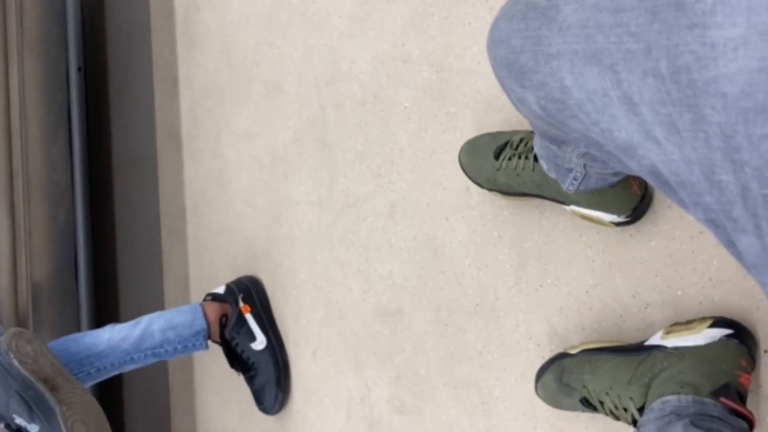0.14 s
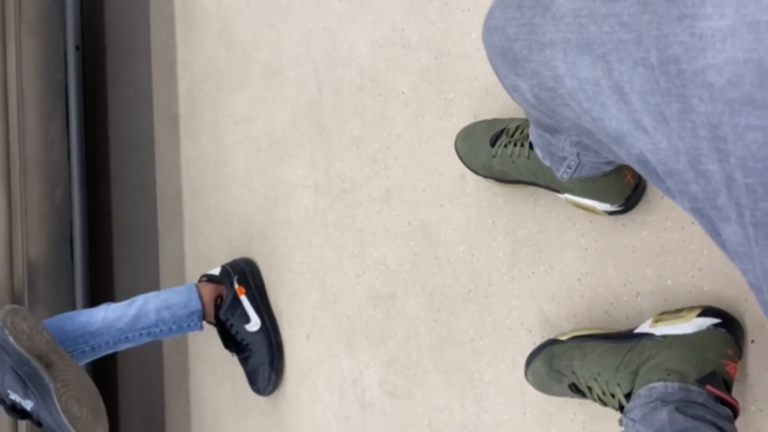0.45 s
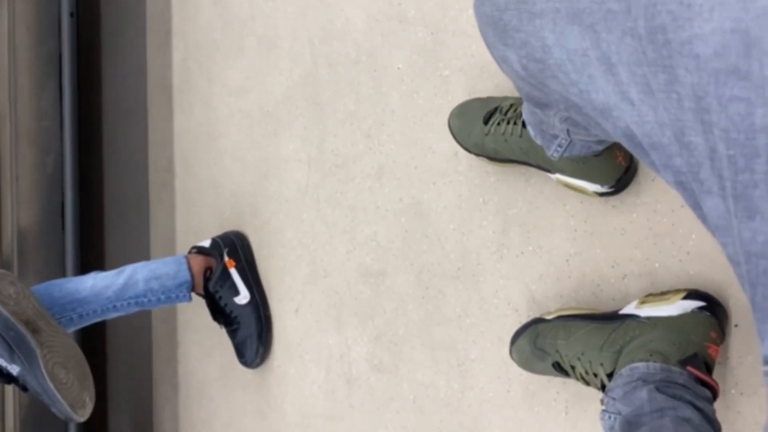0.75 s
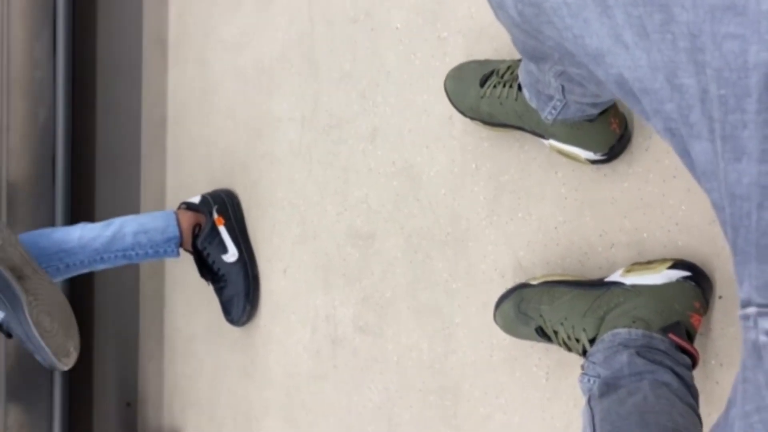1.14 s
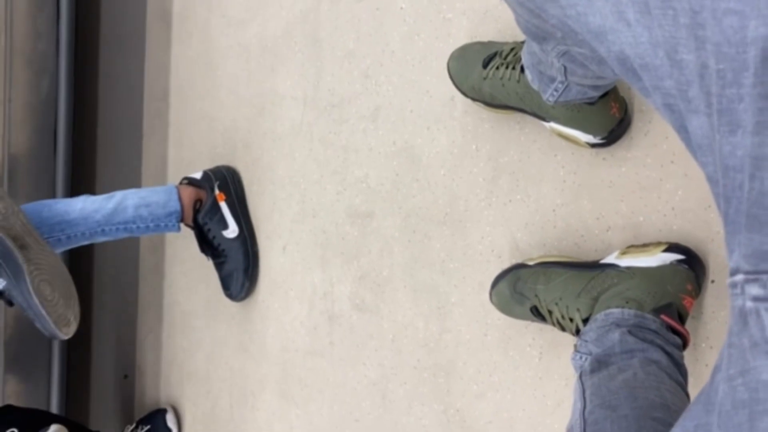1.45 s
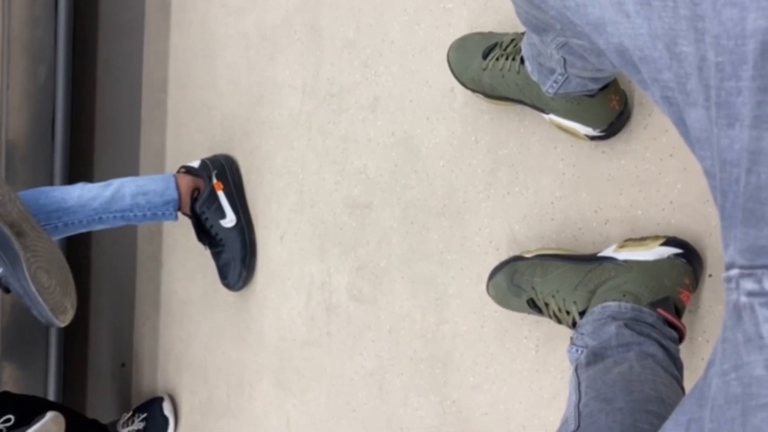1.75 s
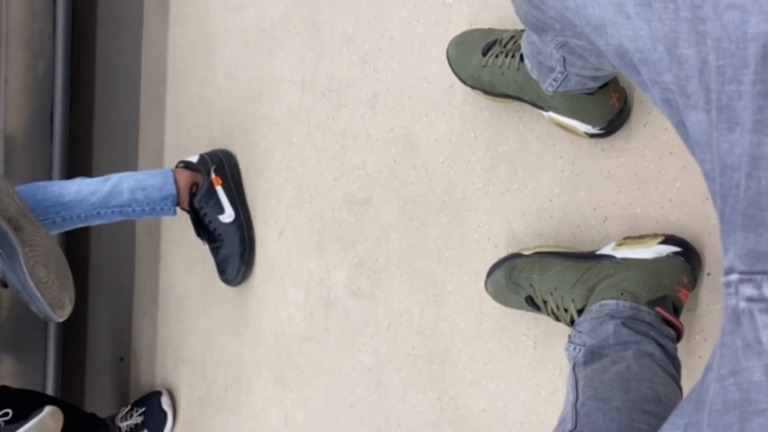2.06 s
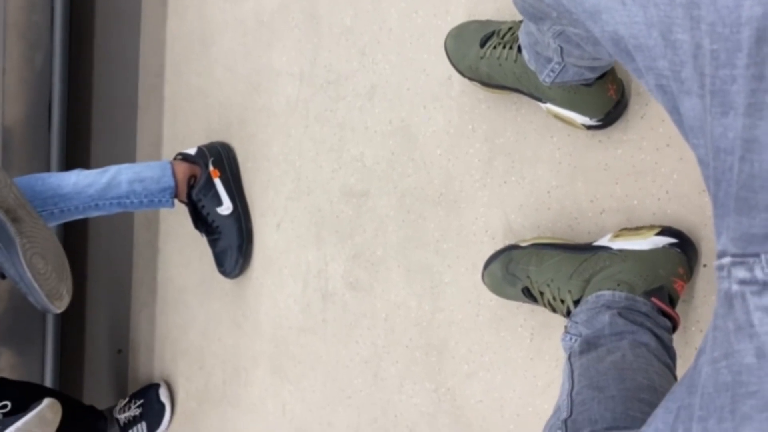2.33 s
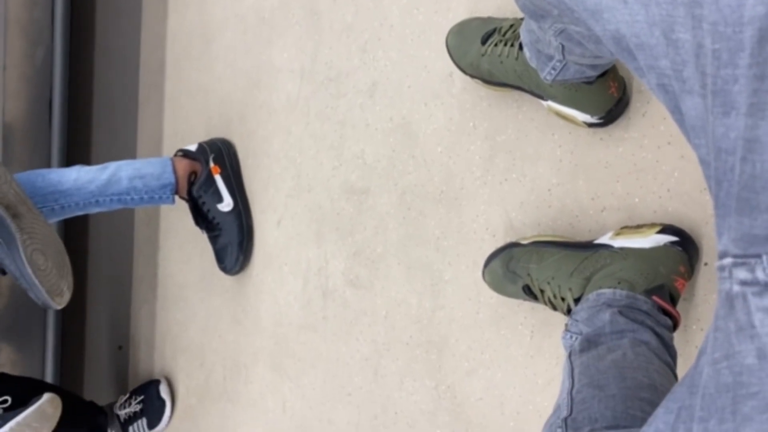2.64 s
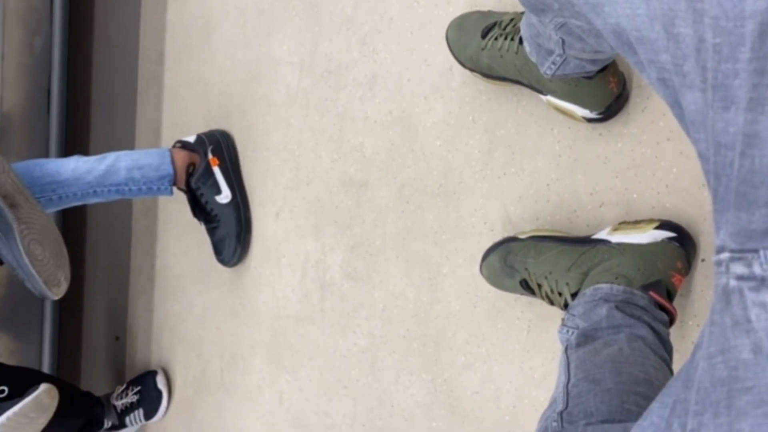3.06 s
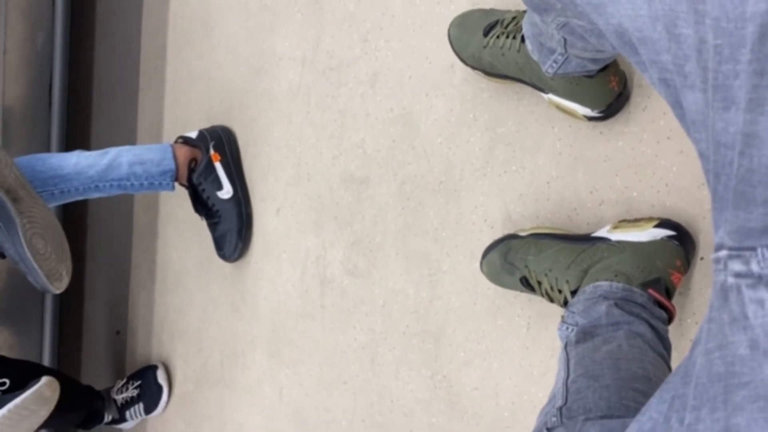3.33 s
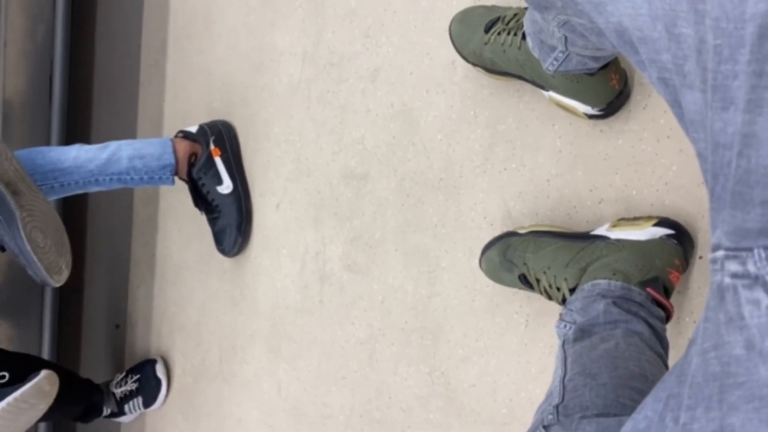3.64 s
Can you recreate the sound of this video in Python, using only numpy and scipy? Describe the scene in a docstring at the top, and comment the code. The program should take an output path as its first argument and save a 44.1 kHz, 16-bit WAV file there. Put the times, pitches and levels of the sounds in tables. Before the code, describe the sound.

A running subway train rumbles and drones steadily from within, with soft jolts and faint wheel ringing

```python
"""Inside a running metro carriage

The car body rumbles as shaped noise with soft, decaying low jolts; a drive hum throbs over a low drone.
The wheels roar as flickering bands of noise, ring as narrow bands and briefly sing as gliding tones.
A few thin, fluttering hisses and one broader rush are enveloped noise.
Two closely spaced microphones hear nearly the same bass and a more diffuse treble.
"""
import sys
import numpy as np
from scipy import signal
from scipy.fft import rfft, irfft
from scipy.io import wavfile
from scipy.ndimage import uniform_filter1d

SR = 44100
rng = np.random.default_rng(int(sys.argv[2]) if len(sys.argv) > 2 else 0)


def unload_wav(signal):
    """Save mono or channel-first audio to the path in sys.argv[1] as 16-bit WAV at rate SR, clipped to [-1, 1]."""
    wavfile.write(
        sys.argv[1],
        SR,
        np.round(np.clip(np.atleast_2d(signal).T, -1, 1) * 32767).astype(np.int16),
    )


N = 167580
SIDES = np.array([[1], [-1]])  # left microphone, right microphone

# Course of the rolling noise. Each row: time in seconds, level in dB.
ROLLING_LEVEL = [(0.0, -29.5), (0.1, -32), (0.17, -30), (0.51, -31.5), (0.97, -30.5), (1.5, -29.5),
                 (1.84, -31), (2.14, -28), (2.45, -30), (2.75, -30.5), (2.99, -28.5), (3.6, -30),
                 (3.8, -29)]
ROLLING_REF_DB = -30.5  # the level at which the rolling noise is neither raised nor lowered


def undb(db):
    """Amplitude ratio of a level in dB."""
    return 10 ** (np.asarray(db) / 20)


def times():
    """Time of every sample in seconds."""
    return np.arange(N) / SR


def freqs():
    """Frequency of every spectrum bin in Hz, kept at 1 Hz or more for the logarithms."""
    return np.maximum(np.arange(N // 2 + 1) * SR / N, 1)


def curve(rows, column=1):
    """One column of a control table, joined by straight lines in time."""
    rows = np.array(rows, float)
    return np.interp(times(), rows[:, 0], rows[:, column])


def over_freq(rows, column=1):
    """One column of a table, joined by straight lines over log frequency."""
    rows = np.array(rows, float)
    return np.interp(np.log(freqs()), np.log(rows[:, 0]), rows[:, column])


def colour(rows):
    """Gain that gives unit noise the listed dB per Hz, falling steeply beyond the table's ends."""
    f = freqs()
    beyond_ends = np.minimum(1, np.minimum(f / rows[0][0], rows[-1][0] / f)) ** 4
    return undb(over_freq(rows)) * np.sqrt(SR / 2) * beyond_ends


def walk(rate):
    """Slow chance with a spread near 1: random steps, rate per second, smoothed twice."""
    k = int(SR / rate)
    steps = np.repeat(rng.standard_normal(N // k + 1), k)[:N]
    return 1.3 * uniform_filter1d(uniform_filter1d(steps, k), k)


def envelope(start, attack, hold, decay, db):
    """Linear attack, hold, exponential release."""
    t = times() - start
    release = np.exp(-np.maximum(t - attack - hold, 0) / decay)
    return undb(db) * np.clip(t / attack, 0, 1) * release


def rolling_effort_db():
    """Rise and fall of the rolling noise around its reference level."""
    return curve(ROLLING_LEVEL) - ROLLING_REF_DB


def cabin_field():
    """Spectrum of unit noise in the cabin, part shared by the two microphones and part opposed."""
    # Each row: frequency in Hz, likeness of the two microphones from 0 to 1,
    # phase lead of the right one in radians, level of left minus right in dB.
    microphones = [(50, 1, .02, 0), (120, .997, .06, -.2), (220, .985, .2, -.8), (400, .94, .38, -.8),
                   (550, .68, .8, -1), (800, .52, .9, -1.3), (1050, .2, 2.8, -1.2), (1500, .25, 4.7, -1),
                   (2000, .4, 5.6, -.6), (2600, .5, 4, 0), (3300, .56, 4.1, 0), (4150, .64, 5, -.4),
                   (4700, .4, 5, 0), (5200, .63, 5.7, 0), (6200, .77, 4.4, 0), (7400, .9, 3.14, 0),
                   (8300, .78, 2.3, 0), (9000, .77, 1.3, 0), (10500, .8, 0, 0), (12500, .7, -1.4, 0)]
    shared, opposed = rfft(rng.standard_normal((2, N)))
    likeness = over_freq(microphones, column=1)
    lead = over_freq(microphones, column=2)
    pan_db = over_freq(microphones, column=3)
    pair = shared * np.sqrt((1 + likeness) / 2) + SIDES * opposed * np.sqrt((1 - likeness) / 2)
    return pair * undb(SIDES * pan_db / 2) * np.exp(-.5j * SIDES * lead)


def rumble():
    """The car body shakes as low noise, with now and then a soft, damped jolt from the track."""
    # Spectrum of the shaking body. Each row: frequency in Hz, density in dB per Hz.
    body_spectrum = [(15, -74), (24, -61), (33, -48.5), (56, -40), (70, -44), (92, -52), (120, -49.5),
                     (160, -53), (215, -53), (265, -65), (400, -74)]
    # Course of the shaking. Each row: time in seconds, level in dB.
    shaking = [(0.0, -30), (0.24, -28), (0.4, -30.5), (0.7, -25), (0.93, -27.5), (1.1, -26), (1.26, -30.5),
               (1.48, -28), (1.85, -26.5), (2.3, -26), (2.7, -26.5), (3.48, -25.5), (3.8, -25.5)]
    # Jolts. Each row: time of the envelope's peak in seconds, level of that peak in dB.
    jolts = [(.30, -30), (.61, -19), (.70, -16), (1.53, -16), (2.18, -21), (2.30, -23), (2.86, -21),
             (2.96, -20), (3.04, -20), (3.24, -18), (3.55, -25)]
    shaking_ref_db, follow = -27.5, 0.77  # neutral level, dB of rumble per dB of shaking
    jolt_hz, rise_s = 54.2, .012
    out = irfft(cabin_field() * colour(body_spectrum), N)
    out = out * undb(follow * (curve(shaking) - shaking_ref_db))
    for peak_time, db in jolts:
        t = np.maximum(times() - peak_time + rise_s, 0)
        thump = t / rise_s * np.exp(1 - t / rise_s)
        out = out + undb(db) * thump * np.sin(2 * np.pi * jolt_hz * t)
    return out


def roar():
    """Rolling noise: half-octave bands swell together and flicker alone."""
    # Spectrum of the rolling roar. Each row: frequency in Hz, density in dB per Hz.
    roar_spectrum = [(180, -79.5), (270, -61), (340, -55), (400, -57), (480, -58), (630, -65), (740, -59.5),
                     (860, -61.3), (1050, -64.5), (1300, -69.6), (1650, -73.5), (2300, -78), (3000, -79.5),
                     (3900, -85.5), (4700, -87.3), (5400, -87.5), (6200, -90.5), (7400, -96.5), (8500, -99),
                     (10500, -105), (11800, -112.5), (13000, -116)]
    swell_follow, treble_follow = 1.14, 0.37  # dB of change per dB of effort and flicker
    flicker_db, flicker_rate = 1.2, 16  # spread before that scaling, steps per second
    effort_db = rolling_effort_db()
    field, out = cabin_field() * colour(roar_spectrum), 0
    place = np.clip(2 * np.log2(freqs() / 250), 0, 9)  # half octaves above 250 Hz
    for k in range(10):
        crossfade = np.maximum(1 - abs(place - k), 0)
        band = irfft(field * crossfade, N)
        follow = swell_follow if k < 6 else treble_follow  # treble bands centre on 2 kHz and up
        out = out + band * undb(follow * (effort_db + flicker_db * walk(flicker_rate)))
    return out


def wheels():
    """Rail roughness keeps wheel and rail modes ringing; rubbing lifts those near one pitch."""
    # Ringing modes. Each row: frequency in Hz, width in Hz (the gain halves two widths away),
    # rms level in dB before the trim.
    modes = [(340, 11, -44), (449, 6, -46.5), (540, 6, -51.5), (726, 7, -47.2), (850, 7, -52),
             (1062, 6, -54), (1920, 32, -50.5), (2030, 40, -53.5), (2519, 6, -62.5), (2583, 9, -53.8),
             (2605, 30, -57), (2851, 30, -57), (3101, 8, -63.5), (3271, 7, -62.5), (3329, 7, -60),
             (3374, 8, -66), (3430, 80, -57), (4134, 8, -67), (4200, 22, -60.5), (5190, 35, -64.5)]
    # Moments when the wheels rub harder. Each row: start, attack, hold and decay in seconds,
    # lift in dB for a mode right at the rubbing pitch.
    rubs = [(1.16, .05, 0.22, .1, 1), (2.06, 0.1, 0.22, 0.1, 3.2), (3.07, .09, 0.047, 0.039, 5.5)]
    rubbing_hz, rubbing_octaves = 2400, 0.63  # centre and reach of the lift
    trim_db, waver_db, waver_rate = -0.4, 2.5, 26  # waver: spread in dB, steps per second
    drift, drift_rate = 0.000497, 7  # share by which each pitch wanders, steps per second
    field, out, t = cabin_field(), 0, times()
    effort_db = rolling_effort_db()
    lift_db = sum(lift * envelope(start, attack, hold, decay, 0)
                  for start, attack, hold, decay, lift in rubs)
    for hz, width, db in modes:
        shape = 1 / (1 + ((freqs() - hz) / (2 * width)) ** 2)
        steady = irfft(field * shape / np.sqrt(np.mean(shape ** 2)), N)
        # reading the ring at a slightly uneven pace makes its pitch drift
        drifting = t + np.cumsum(drift * walk(drift_rate)) / SR
        ring = np.array([np.interp(drifting, t, side) for side in steady])
        # modes near the rubbing pitch follow the rubs, the others the rolling
        share = np.exp(-(np.log2(hz / rubbing_hz) / rubbing_octaves) ** 2)
        driven_db = share * lift_db + (1 - share) * effort_db
        out = out + ring * undb(db + trim_db + driven_db + waver_db * walk(waver_rate))
    return out


def singing():
    """Now and then one wheel or rail resonance swells into a short, wavering tone and fades."""
    # Each row: start in seconds, length in seconds, pitch at the middle in Hz,
    # glide from start to end in Hz, rms level at the crest in dB before the trim.
    sings = [(.08, .5, 342, -4, -37), (.33, .12, 3332, 0, -56.5), (.79, .11, 3328, 0, -55.5),
             (0.949, .45, 341, 0.5, -39), (1.28, 0.34, 731, -0.5, -42.5), (1.45, 0.34, 454, 24.5, -41.5),
             (1.55, 0.18, 345.8, 0, -37.5), (1.876, 0.21, 334, -2, -34.5), (1.9, .2, 727, -1, -40),
             (2.09, .13, 745, 1, -37.5), (2.1, 0.26, 448, -0.5, -39.5), (2.218, .16, 726, -3, -40),
             (2.256, 0.081, 3325, 0, -51), (2.45, 0.23, 761, 0, -43), (2.73, .11, 2597, -1, -54),
             (2.76, .22, 327.1, 0, -35), (2.96, .16, 348, -1, -37), (3.06, .13, 1998, -2, -50.5),
             (3.12, .18, 2606, -1, -50), (3.161, 0.33, 396.5, -46.5, -38.5), (3.2, 0.19, 733, -20.5, -37.5),
             (3.22, 0.19, 349, 0, -35), (3.576, 0.21, 332.4, -15, -34.5), (3.66, .14, 726, -3, -39)]
    trim_db, waver_spread_db, wander_spread_hz = 2.5, 1.5, 2.88
    waver_rate = 30  # steps per second, for level and pitch
    diffuse_hz = 1000  # from here up the microphones hear a tone a quarter cycle apart
    t, out = times(), np.zeros((2, N))
    wander_hz = wander_spread_hz * walk(waver_rate)
    waver_db = waver_spread_db * walk(waver_rate)
    for start, length, hz, glide_hz, db in sings:
        on = (t > start) & (t < start + length)
        along = (t[on] - start) / length
        pitch = hz + glide_hz * (along - .5) + wander_hz[on]
        phase = 2 * np.pi * (rng.random() + np.cumsum(pitch) / SR)
        lag = np.pi / 2 * min(hz / diffuse_hz, 1)
        swell = np.sin(np.pi * along) * undb(db + trim_db + waver_db[on])
        out[:, on] += np.sqrt(2) * swell * np.sin(phase - SIDES * lag / 2)
    return out


def hum():
    """A clean, throbbing sine of the drive over a lower, wandering sine drone of the car body."""
    # Drive hum. Each row: time in seconds, level in dB before throb depth and trim, pitch in Hz.
    drive = [(0.0, -27, 199.3), (0.04, -26, 198.6), (0.69, -28.5, 198.4), (0.79, -21.5, 199.1),
             (1.14, -30, 200), (1.24, -23, 198.5), (1.42, -22.5, 197.6), (1.51, -30.5, 198.5),
             (1.59, -28.5, 198.6), (1.75, -20.5, 198.6), (1.95, -27.5, 198.3), (2.15, -31, 198.6),
             (2.29, -23, 198.4), (2.44, -27.5, 198.2), (2.59, -22.5, 199.3), (2.77, -23, 198.2),
             (2.94, -39.5, 197.5), (3.1, -24.5, 198.6), (3.19, -20.5, 199.1), (3.43, -29, 196.9),
             (3.51, -20.5, 199.3), (3.7, -24.5, 197.1), (3.76, -30, 195), (3.8, -33, 191)]
    # Drone of the car body. Each row: time in seconds, rms level in dB before the trim.
    drone_level = [(0.0, -24), (0.05, -25), (0.17, -40.5), (0.51, -27), (1.24, -30.5), (1.29, -23),
                   (1.46, -41), (1.54, -19.5), (1.82, -37), (1.98, -27), (3.26, -25.5), (3.38, -40),
                   (3.44, -23), (3.8, -32)]
    mean_db, throb_depth = -27, 1.07  # the throb is deepened around this level
    trim_db, waver_db = -0.5, 0.5
    left_lag_rad, left_pan_db = 0.28, -.9  # left microphone against right
    drone_hz, drone_trim_db, drone_wander = 80.16, -1, 0.0079  # wander as a share of the pitch
    phase = 2 * np.pi * np.cumsum(curve(drive, column=2)) / SR
    throb_db = mean_db + throb_depth * (curve(drive) - mean_db)
    level_db = throb_db + trim_db + waver_db * walk(18)
    tone = np.sin(phase - SIDES * left_lag_rad / 2) * undb(level_db + SIDES * left_pan_db / 2)
    drone_phase = 2 * np.pi * np.cumsum(drone_hz * (1 + drone_wander * walk(8.03))) / SR
    drone = np.sin(drone_phase) * undb(curve(drone_level) + drone_trim_db)
    return np.sqrt(2) * (tone + drone)


def hisses():
    """Thin, fluttering hisses and one broader rush of noise, like air being let off."""
    # Short hisses. Each row: start, attack, hold and decay in seconds, gain in dB.
    bursts = [(0.024, 0.036, .03, 0.072, -7), (0.688, 0.011, 0.011, 0.068, 1),
              (3.12, 0.38, 0.11, 0.19, -11), (3.697, 0.05, 0.079, .06, 1)]
    # Spectrum of the hisses. Each row: frequency in Hz, density in dB per Hz before the gain.
    hiss_spectrum = [(2500, -105), (4500, -84.5), (6500, -85.5), (9000, -86), (11000, -88.5), (12300, -94),
                     (15000, -110)]
    # The broad rush, a single row: start, attack, hold and decay in seconds, gain in dB.
    rush = (3.715, .04, .1, .06, -4)
    # Spectrum of the rush. Each row: frequency in Hz, density in dB per Hz before the gain.
    rush_spectrum = [(1200, -95), (3000, -69), (5500, -82.5), (7000, -77), (10000, -98)]
    flutter_db, flutter_rate = 1, 76  # spread in dB, steps per second
    flutter = undb(flutter_db * walk(flutter_rate))
    thin = irfft(cabin_field() * colour(hiss_spectrum), N)
    thin = thin * sum(envelope(*row) for row in bursts) * flutter
    broad = irfft(cabin_field() * colour(rush_spectrum), N) * envelope(*rush)
    return thin + broad


def scene():
    """All sources together, as they reach the two microphones."""
    return rumble() + roar() + wheels() + singing() + hum() + hisses()


def record(dry):
    """The recorder cuts the top with a steep elliptic low-pass."""
    top_hz = 12700
    low_pass = signal.ellip(8, .2, 70, top_hz, fs=SR, output="sos")  # .2 dB ripple, 70 dB stop
    return signal.sosfilt(low_pass, dry)


dry = scene()
out = record(dry)
unload_wav(out)
```